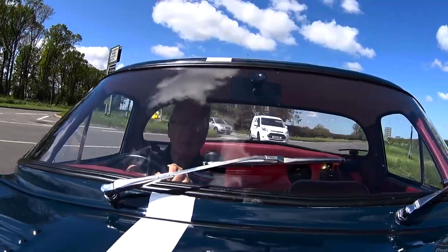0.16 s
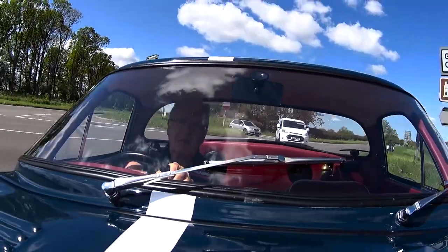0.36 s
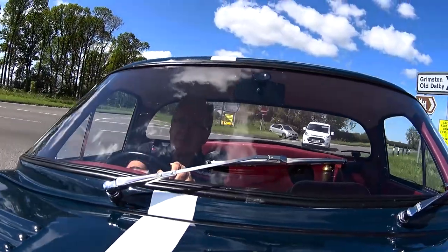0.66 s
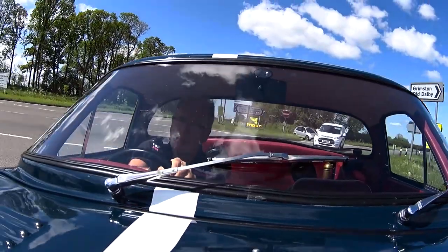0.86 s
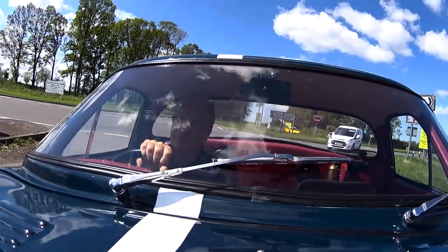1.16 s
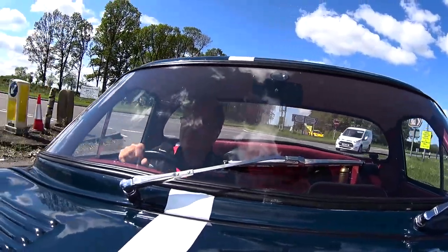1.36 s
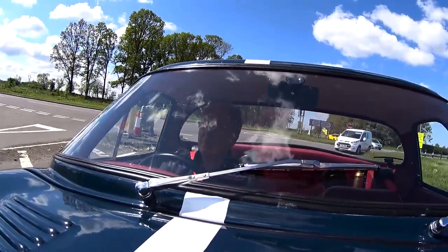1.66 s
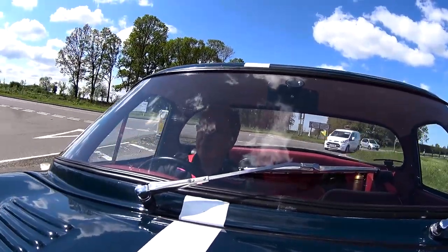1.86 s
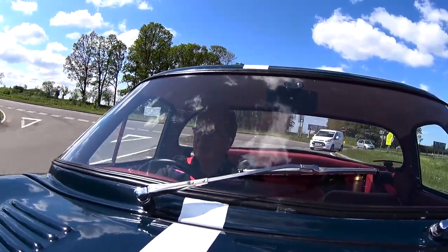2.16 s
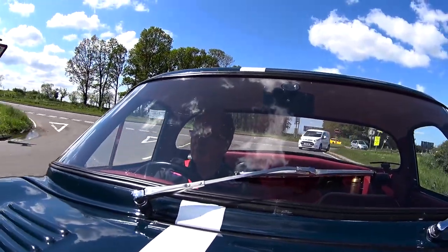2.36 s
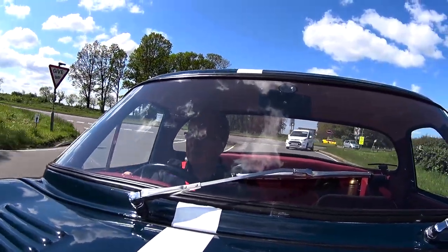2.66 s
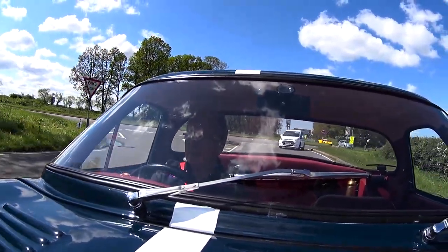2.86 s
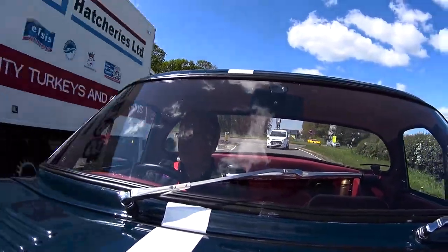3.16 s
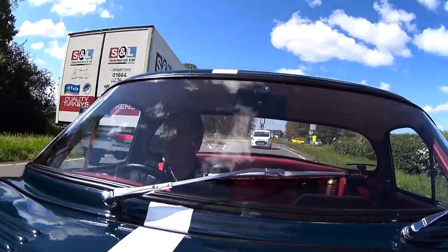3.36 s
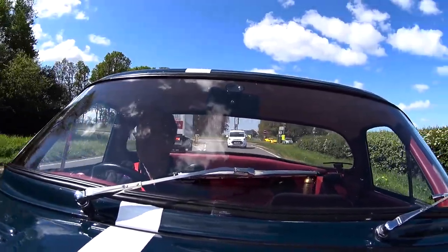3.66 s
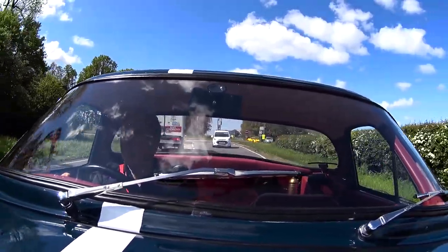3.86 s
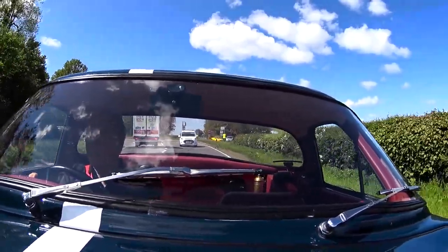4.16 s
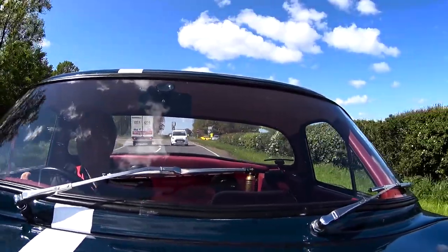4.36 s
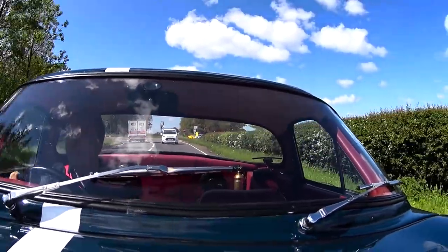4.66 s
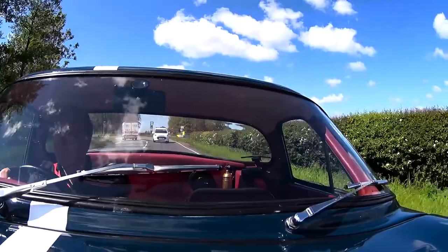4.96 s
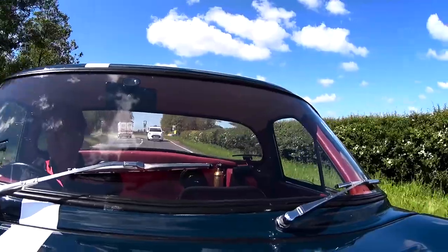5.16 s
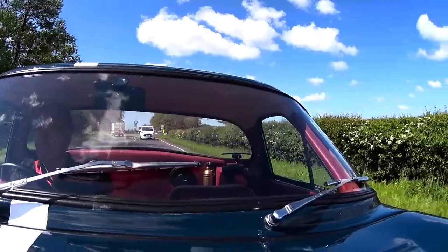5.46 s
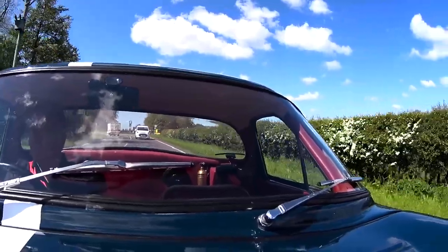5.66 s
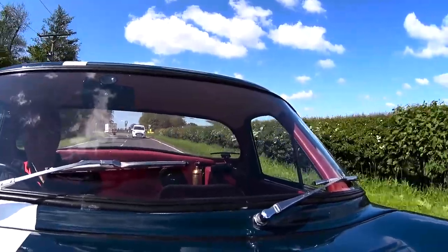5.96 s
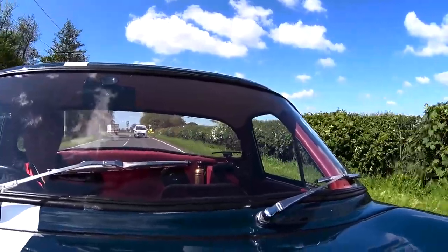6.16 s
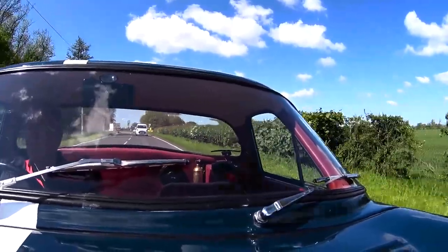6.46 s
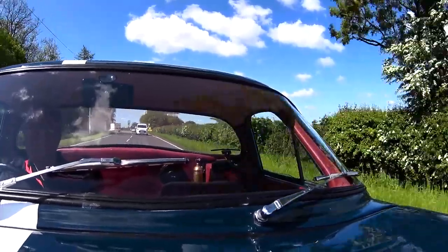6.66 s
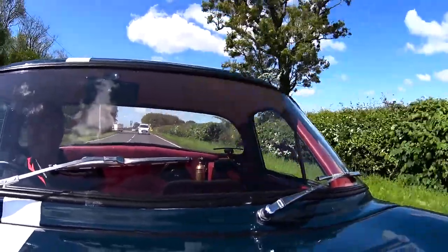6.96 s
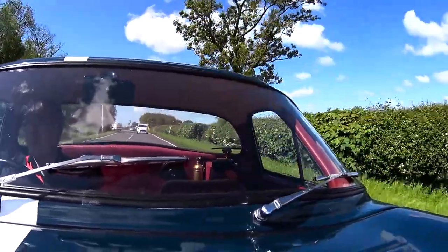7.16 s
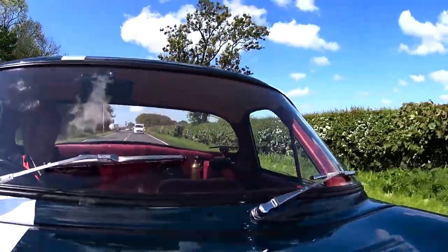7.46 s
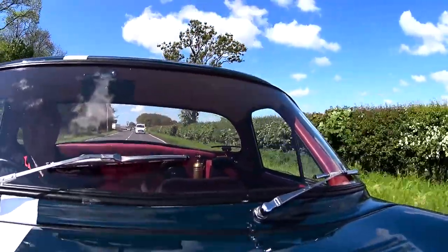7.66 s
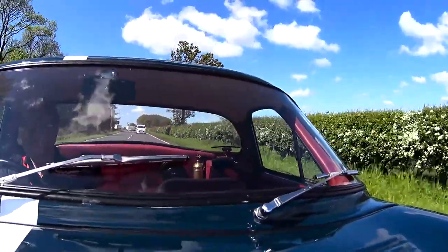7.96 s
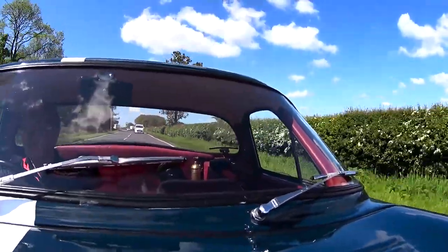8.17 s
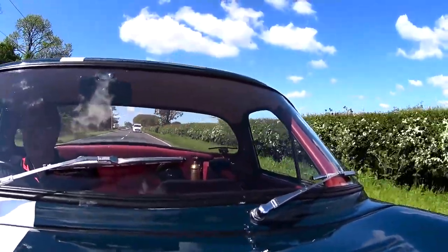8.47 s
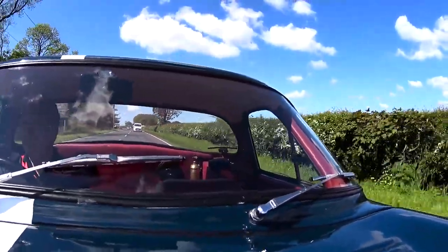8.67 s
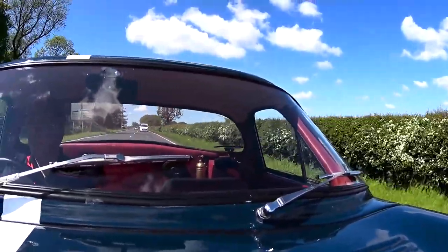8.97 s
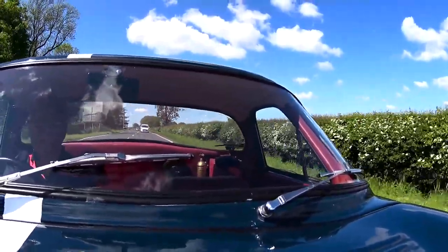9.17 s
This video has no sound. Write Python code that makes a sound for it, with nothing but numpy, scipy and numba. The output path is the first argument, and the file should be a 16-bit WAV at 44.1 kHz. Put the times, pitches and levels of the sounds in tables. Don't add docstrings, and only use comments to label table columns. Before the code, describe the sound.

A classic car's V8 on a country road, heard by a wide stereo microphone on the bonnet in the wind. First a quiet, rough coasting hum with rattling trim, then a long smooth acceleration into a hard growl, gusts thudding at the microphone and tiny metallic pings. One upshift brings a short dip, a driveline kick and a fresh burst of rattles before it pulls again.

```python
import sys
import numpy as np
from scipy import signal
from scipy.fft import rfft, irfft, next_fast_len
from scipy.io import wavfile
from scipy.ndimage import uniform_filter1d
from numba import njit

SR = 44100
rng = np.random.default_rng(int(sys.argv[2]) if len(sys.argv) > 2 else 0)


def dump_mix(stems):
    frames = np.atleast_2d(stems).T
    limited = np.clip(frames, -1, 1)
    pcm = np.round(limited * 32767).astype(np.int16)
    wavfile.write(sys.argv[1], SR, pcm)


def ratio(d):
    e = np.asarray(d, float) / 20
    return 10 ** e


N = 410571
HOP = 256
FRAMES = N // HOP + 2
T_S = np.arange(N) / SR

# t/s, load/dB, throttle shut/0-1, roughness/0-1
LOAD = [(0, -27, 0.7, 0.38), (1.1, -25.5, 0.66, 0.41), (1.18, -27, 0.27, 0.08), (2, -25.5, 0.31, 0.07),
        (3.2, -23, 0.33, 0.07), (3.8, -17, 0.2, 0), (4.4, -13.5, 0.34, 0.04), (5, -15, 0.17, 0.08),
        (5.5, -8.5, 0.28, 0.23), (6, -10.5, 0.2, 0.07), (6.5, -11.5, 0, 0), (7.03, -10.5, 0.24, 0.09),
        (7.15, -19, 0.18, 0.3), (7.7, -39, 0.5, 0.06), (8.07, -44, 1, 0), (8.12, -16, 0.12, 0.04),
        (8.6, -19, 0.13, 0.15), (9.31, -10.5, 0.42, 0.19)]
STRONG_ORDERS = [4, 8, 1, 3, 5, 17, 2, 1.5]
LOAD_MID_DB = -14
CLUTCH_OUT_S, CLUTCH_BITE_S, CLUTCH_IN_S = 7.06, 7.95, 8.3
PATCH_END_S = 1.35


def curves(table, size):
    s, *columns = np.transpose(table)
    grid_s = np.arange(N // size + 3)[:N] * size / SR
    return [np.interp(grid_s, s, c) for c in columns]


def at(table, hz):
    table_hz, db = np.array(table).T[:2]
    return np.interp(np.log(hz), np.log(np.maximum(table_hz, 1)), db)


def walk(rate_hz, count, size=FRAMES):
    k = max(int(SR / HOP / rate_hz), 1)
    w = uniform_filter1d(uniform_filter1d(rng.standard_normal((count, size)), k), k)
    return w / w.std()


def per_sample(row):
    return np.interp(np.arange(N) / HOP, np.arange(FRAMES), row)


def fade(t, start_s, end_s, edge_s):
    return np.clip(np.minimum(t - start_s, end_s - t) / edge_s, 0, 1)


def resonance(hz, f, width):
    return 1 / (1 + (2 * (hz - f) / width) ** 2)


def spread(mid, side, hz):
    # f/Hz, left minus right/dB
    lean = [(60, 1.5), (110, 4.5), (200, 1.5), (380, -1.5), (700, 0.5), (1290, -1), (2380, -0.5),
            (4400, -0.5), (8120, -0.5), (15000, 0)]
    lean_db = at(lean, hz) / 2
    return np.array([(mid + side) * ratio(lean_db), (mid - side) * ratio(-lean_db)])


def crank(size):
    # t/s, crank/Hz
    in_gear = [(0.0, 36.57), (0.28, 35.26), (1.05, 34.16), (1.3, 34.88), (1.75, 37.5), (2.2, 40.1),
               (2.8, 44.6), (3.1, 47.27), (4.0, 56.9), (4.4, 61.78), (5.1, 69.22), (5.8, 76.52),
               (6.4, 83.74), (6.8, 87.7), (8.4, 61.8), (8.8, 63.91), (9.31, 66.16)]
    # t/s, crank/Hz
    change_up = [
        (7.06, 89.2),
        (7.21, 84.2),
        (7.776, 64.8),
        (7.864, 67.1),
        (7.934, 61.45),
        (8.05, 61),
        (8.11, 64.96),
        (8.142, 65.3),
        (8.254, 61.03),
    ]
    return curves(sorted(in_gear + change_up), size)[0]


def declutched(t, rise_s):
    return np.clip(np.minimum((t - CLUTCH_OUT_S) / rise_s, (CLUTCH_BITE_S - t) / 0.027 + 1), 0, 1)


def strong_orders(hz, load_db, shut):
    strength = [(-27.5, -10.5, 0.26, 2.5), (-41.5, -2, 0.13, 8.5), (-31, 3.5, 0.037, 10),
                (-35, 1, 0.079, 3), (-48, -1, 0.12, 4), (-61, 1, 0.092, 13), (-37, -22, 0.46, 5),
                (-28, -1, 1, -24)]
    high_gear_db = [2, 2.5, -8, 4, 1, -3, 5, 4]
    # f/Hz, width/Hz, in gear/dB, change with clutch out/dB
    exhaust_modes = [(158, 35, 6, .1), (204, 31, 10.5, -2), (254.6, 30.7, 12.5, 0), (289.7, 45, 9, -10.5),
                     (322.4, 38.6, -15.5, 9), (341, 36, 7, 9), (474.5, 38, 12.5, 3), (520, 4.8, 0, -7),
                     (566, 27, 6.5, 0), (639, 74, -11, 14), (697.6, 52, 6.5, 9)]
    # f/Hz, width/Hz, in gear/dB, change with clutch out/dB
    mount_modes = [(40.1, 1.5, 4.5, .1), (51.7, 8.5, 3.5, 3), (58.8, 6.8, 11.5, -9), (97.7, 3.7, 9.5, -1),
                   (120, 32, -13, -1), (166.7, 18, 8, -8), (205, 27, 3, 14), (228, 12, -2.5, 3.5),
                   (255.3, 67, 14.5, -5), (341, 35, 10, 7), (399, 73, 6.5, 18.5), (733, 58.2, 5, 3),
                   (834, 56, 12.5, .1), (932, 86, 10.5, 2), (1020, 60, -10, .1), (784, 39, -8, .1)]
    t = np.arange(len(shut)) * HOP / SR
    db, shut_db, share, pull_db = np.transpose(strength)[:, :, None]
    free = declutched(t, 0.24)
    exhaust, mounts = (sum((g + change * free) * resonance(hz, f, w) for f, w, g, change in modes)
                       for modes in (exhaust_modes, mount_modes))
    firing = np.array(STRONG_ORDERS)[:, None] % 4 == 0
    db = db + shut_db * shut + share * (load_db - LOAD_MID_DB)
    db = db + pull_db * fade(t, 1.85, CLUTCH_OUT_S, 0.1)
    db = db + np.c_[high_gear_db] * (t > CLUTCH_BITE_S)
    return db + np.where(firing, exhaust, mounts)


def order_levels(order, crank_hz, load_db, shut):
    # order, under load/dB, change with throttle shut/dB
    source = [(.5, -47, -13), (2.5, -33.5, -1.5), (3.5, -38, -21), (4.5, -44, 9), (5.5, -31.5, 3.5),
              (6, -24.5, -39), (6.5, -28, 8), (7.0, -25.5, -2), (7.5, -30.5, -6), (8.5, -30.5, -19),
              (9, -24.5, -14.5), (9.5, -24, -24), (10, -27.5, -4.5), (11.5, -35.5, -3), (12.0, -28, -22),
              (13.0, -34.5, -13), (13.5, -27, -16), (14, -21.5, -30), (15.0, -30.5, -7.5),
              (16.0, -25.5, -16), (16.5, -21.5, -26), (17.5, -28, -7), (18.0, -28.5, -15), (19.0, -30, -17),
              (19.5, -26, -19), (20, -26.5, -19), (20.5, -30.5, -18), (21.0, -40, -5), (22.0, -33.5, -16)]
    # order, slope/dB per octave of crank speed, change in high gear/dB, trim/dB
    drift = [(.5, 2, -9, 0.5), (3.5, -3, -8, 2), (4.5, 0, 0, 4), (5.5, 3, -2.5, -1), (6, 1.5, -4.5, 3),
             (6.5, 3.5, -9, -2.5), (7, 7, -2, -2), (7.5, 4.5, -3, 0.5), (8.5, -5, 7.5, 2), (9, -8, -4, -3),
             (9.5, -7.5, 4, -0.5), (10, 1, 7, -3), (10.5, -0.5, -5, -0.5), (11, -4.5, 7, 4),
             (11.5, 11, 8, -1), (12, 3, 6, 1), (12.5, 2.5, 4, 2), (13, 2.5, -11, 2), (13.5, 7, 3.5, 0),
             (14, 5.5, -3, -1.5), (14.5, 11.5, -1, -1), (15, 9, -11, -1), (15.5, 5, 0, -0.5),
             (16, 8, 3, -0.5), (16.5, 4, 8, 0.5), (17.5, -0.8, -0.5, 1.2)]
    # f/Hz, width/Hz, level/dB
    body = [(83.2, 26, 17), (134, 59, 18), (181, 22, 9.5), (259, 56, 24), (347.4, 47, 13.5), (403, 65, 8.5),
            (475, 45.3, 21), (517, 10.5, 7), (556.8, 33.6, 12), (605, 30, 2.5), (691, 52, 11.5),
            (854, 20, 13), (929, 63, 15), (1039.4, 45, 1.5), (1145, 75, 13), (1235, 23, 13), (1591, 67, 12),
            (1737, 50, 10)]
    # order, t/s, length/s, level/dB
    surges = [(8, 2.24, 0.19, 8.5), (8, 8.16, 0.22, 2), (6, .2, .25, -6), (6, 1.1, .25, 4),
              (6, 3.12, 0.21, 12.5), (6, 5.24, 0.17, 1), (6.5, 3.96, 0.97, -6), (8.5, 9, .4, -6),
              (7, 6.1, .4, -8), (7, 9.9, .25, 2), (7, 7.8, .25, -6), (7.5, 5.4, .35, -13),
              (7.5, 5.9, .25, 13), (5.5, 4.23, 0.27, 7.5), (5.5, 6.52, 0.2, -8), (5.5, 7.66, .35, 8),
              (5, 7, .2, 12), (5, 9.8, .25, 14), (3, 7.35, 0.14, -11), (3, 8.5, 0.28, -7),
              (4, 6.62, .25, -6.5), (4, 8.5, 0.29, -7), (2, 2.6, .7, 6), (4.5, 3.2, 0.38, 10),
              (4.5, 8.6, .25, 8), (10, 4.33, 0.22, 14), (10, 1.9, 0.46, 3), (10, 7.1, .6, -5),
              (10, 5.9, .25, 3), (12, 2.97, 0.36, 13), (12, 3.86, .25, 7), (13, 2.4, .4, 8),
              (13, 3.8, .3, 4), (13, 4.84, 0.21, 5), (13, 6.8, 0.45, 4), (9.5, 2.704, 0.23, -14),
              (11, 1.4, 0.27, -5), (17.5, 3.3, 0.63, -10), (16.5, 6.5, .4, -5), (16.5, 8.6, .7, -8),
              (15.5, 2.67, 0.3, 11), (14, 6.7, .35, -2), (8.5, 7.1, 0.31, 6), (7, 9.1, 0.17, -4.5),
              (4, 8.54, 0.27, 3.5), (8, 5.7, 0.16, 5.5), (17, 2.64, .3, 2.5), (7.5, 8.3, 0.18, 4),
              (5.5, .15, .15, -5), (4, 1.24, 0.13, 4)]
    hz, t = order * crank_hz, np.arange(len(shut)) * HOP / SR
    source_order, load_level, shut_change = np.transpose(source)
    db = np.interp(order, source_order, load_level) + shut * np.interp(order, source_order, shut_change)
    drift_order, *columns = np.transpose(drift)
    slope_db, gear_db, trim_db = (np.interp(order, drift_order, c) for c in columns)
    db = db + trim_db + slope_db * np.log2(crank_hz / 60) + gear_db * (t > CLUTCH_BITE_S)
    db = db + load_db - 6.5 * np.log2(1 + hz / 517)
    db = db + sum(g * resonance(hz, f, w) for f, w, g in body)
    rows = (2 * np.array(STRONG_ORDERS)).astype(int) - 1
    db[rows] = strong_orders(hz[rows], load_db, shut)
    return db + sum(g * np.exp(-((order - k) / .3) ** 2 - ((t - s) / d) ** 2) for k, s, d, g in surges)


@njit
def harmonics(cycle_hz, size, hop):
    out, p = np.zeros((2, len(cycle_hz))), 0.
    for i in range(len(cycle_hz)):
        p += 2 * np.pi * cycle_hz[i] / SR
        turn, z, j, u = np.exp(1j * p), 1 + 0j, i // hop, (i % hop) / hop
        for k in range(size.shape[2]):
            z *= turn
            for c in range(2):
                out[c, i] += (z * (size[c, j, k] * (1 - u) + size[c, j + 1, k] * u)).imag
    return out


def engine():
    # f/Hz, side minus mid/dB
    line_width = [(50, -36), (90, -7.5), (150, -16), (225, -4), (262, -21), (350, -14), (420, -14),
                  (475, -9.5), (520, 5.5), (640, -31), (800, -14), (1200, -7), (1800, -6.5)]
    burble_hz = 300
    crank_hz = crank(HOP)
    load_db, shut, rough = curves(LOAD, HOP)
    count = len(rough)
    order = np.arange(1, 61)[:, None] / 2
    hz = order * crank_hz
    db = order_levels(order, crank_hz, load_db, shut)
    db = db + 2.2 * np.clip(hz / burble_hz - .5, .3, 1) * walk(3, 60, count)
    shake = walk(16, 120, count).reshape(2, 60, -1)
    smear = np.clip(rough + .3 * np.clip(2 * (hz / burble_hz - 1), 0, 1), 0, 1)
    mid = np.sqrt(2) * ratio(db) * np.exp(2j * np.pi * rng.random((60, 1)))
    mid = mid * (1 + smear * (shake[0] + 1j * shake[1]))
    path_rad = np.pi / 2 + 0.75 * walk(2.2, 60, count)
    side = mid * ratio(at(line_width, hz)) * np.exp(1j * path_rad)
    size = np.ascontiguousarray(spread(mid, side, hz).transpose(0, 2, 1))
    return harmonics(crank(1) / 2, size, HOP)


def rush(colour, swell_db, flicker_db, flicker_hz):
    # f/Hz, side minus mid/dB
    width = [(25, -8), (60, -3.5), (110, -5.5), (200, -3.5), (380, -7.5), (700, 0), (1290, -7),
             (2380, -2.5), (4400, -3.5), (8120, -2.5), (15000, -2.5)]
    band_oct = .6
    low_hz, high_hz = colour[0][0], colour[-1][0]
    n = next_fast_len(N)
    hz = np.arange(n // 2 + 1) * SR / n + 1e-3
    noise = rfft(rng.standard_normal((2, n))) * ratio(at(colour, hz)) * (hz > low_hz) * (hz < high_hz)
    noise = spread(noise[0], noise[1] * ratio(at(width, hz)), hz)
    centres = np.arange(np.log2(low_hz), np.log2(high_hz) + band_oct, band_oct)
    db = swell_db * walk(flicker_hz, 1) + flicker_db * walk(flicker_hz, len(centres))
    out = 0
    for centre, row in zip(centres, db):
        weight = np.clip(1 - abs(np.log2(hz) - centre) / band_oct, 0, 1)
        out = out + irfft(noise * weight, n)[:, :N] * per_sample(ratio(row))
    return out / out.mean(0).std()


def rush_levels():
    # idle/dB, per octave road/dB, per octave crank/dB, share of load change, clutch out/dB, lorry/dB
    law = [
        (-34.5, 16, 0.11, 0.013, -1.3, 4),
        (-44.5, 11, 3.17, 0.0083, -1, 2.5),
        (-62.5, 8.5, 9.35, 0.036, -2, 2),
    ]
    idle_hz, gear_step = 36, 1.298
    crank_hz, load_db = crank(1), curves(LOAD, 1)[0]
    in_gear = (T_S < CLUTCH_OUT_S) | (T_S > CLUTCH_IN_S)
    geared_hz = crank_hz * np.where(T_S > CLUTCH_IN_S, gear_step, 1)
    road_hz = np.interp(T_S, T_S[in_gear], geared_hz[in_gear])
    lorry = np.exp(-((T_S - 3.22) / 0.19) ** 2)
    free = declutched(T_S - .12, 0.3)
    road_oct, crank_oct = np.log2(road_hz / idle_hz), np.log2(crank_hz / idle_hz)
    return [db + a * road_oct + b * crank_oct + c * (load_db - LOAD_MID_DB) + d * free + e * lorry
            for db, a, b, c, d, e in law]


def airflow():
    # t/s, level/dB
    gusts = [(0.0, -31), (1.19, -27.5), (1.27, -27.5), (1.74, -47), (1.94, -33), (3.11, -32.5),
             (3.19, -23.5), (3.86, -29), (3.94, -22.5), (4.43, -19.5), (4.69, -29), (4.77, -19),
             (5.63, -14.5), (5.73, -18.5), (6.92, -15.5), (7.03, -17.5), (7.08, -14.5), (9.31, -18.5)]
    # f/Hz, density/dB per Hz
    wind_colour = [(12, -12.5), (20, 1.5), (26, -1.5), (34, 0), (42, 0), (55, -9.5), (80, -9.5),
                   (120, -20.5), (200, -37)]
    # f/Hz, density/dB per Hz
    tyre_colour = [(50, 4.5), (85, 0.5), (130, -2), (200, -14), (270, -6), (380, -13.5), (480, -11),
                   (650, -43)]
    # f/Hz, density/dB per Hz
    roar_colour = [(420, -21), (500, -22), (620, -9), (800, -11), (1000, -13.5), (1220, -14), (1420, -20),
                   (1700, -20.5), (2100, -28.5), (2600, -33), (3500, -41), (4500, -53)]
    # f/Hz, density/dB per Hz
    hiss_colour = [(1470, -27), (2500, -6), (3750, -7), (5900, -9), (7480, -12), (10900, -13.5),
                   (14800, -21.5), (15600, -19)]
    tyre_db, roar_db, hiss_db = rush_levels()
    firing = np.cos(2 * np.pi * np.cumsum(4 * crank(1)) / SR)
    wind = ratio(curves(gusts, 1)[0] + 9.5) * np.tanh(1.31 * rush(wind_colour, 0.39, 0.42, 12))
    tyres = ratio(tyre_db) * rush(tyre_colour, 0.58, 0.83, 14)
    roar = ratio(roar_db + 0.84) * rush(roar_colour, 0.39, 0.44, 18) * (1 + 0.16 * firing)
    lull_db = -6 * np.exp(-((T_S - 4.892) / .014) ** 2)
    hiss = ratio(hiss_db + lull_db) * rush(hiss_colour, 0.26, 0.24, 18) * (1 + 0.03 * firing)
    return wind + tyres + roar + hiss


def eddies():
    # f/Hz, density/dB per Hz
    eddy_colour = [(15, 11), (30, -11.5), (60, -1.5), (100, -17), (160, -12.5), (250, -13.5)]
    return ratio(rush_levels()[2] + 25.5) * rush(eddy_colour, 2.5, 0.89, 30)[0] * np.array([[1], [-1]])


def patched_tarmac():
    # f/Hz, density/dB per Hz
    patch_colour = [(60, -9), (90, 5), (150, -21), (215, 7), (280, -12.5), (360, -5), (430, -8), (520, -35)]
    return ratio(-30) * rush(patch_colour, 0.7, 1.3, 15) * np.clip((PATCH_END_S - T_S) / 0.044, 0, 1)


def self_noise():
    # f/Hz, density/dB per Hz
    noise_colour = [(2500, 18), (6000, -3), (11000, 7.5), (15700, 0)]
    return ratio(-67.5) * rush(noise_colour, 0.11, .1, 9)


def knocks(events, modes, db, pan_db, chatter):
    out, t = np.zeros((2, N + SR)), np.arange(SR // 3) / SR
    hz, mode_db, t60_s = np.array(modes).T[:, :, None]
    place = np.linspace(-.5, .5, len(modes))[:, None]
    pan = np.array([[pan_db], [-pan_db]]) / 2
    chances = rng.standard_normal((len(events), len(modes), len(t)))
    for (s, peak_db, tilt_db), chance in zip(events, chances):
        size = ratio(mode_db + tilt_db * place + 1.5 * chance[:, :1])
        ring = size * np.sin(2 * np.pi * hz * t) * np.exp(-np.log(1000) * t / t60_s)
        ring = ring * (1 + chatter * uniform_filter1d(uniform_filter1d(chance, size=40), size=40))
        ring = ring.sum(0) * np.minimum(t / 0.001, 1)
        start = int(s * SR)
        out[:, start:start + len(t)] += ring * ratio(peak_db + db + pan)
    return out[:, :N]


def clip_ticks():
    # t/s, peak/dB, tilt lowest to highest mode/dB
    ticks = [(.008, -58, -1), (.6549, -59, -2), (1.3214, -58, -2), (1.8327, -61, -5), (1.9574, -58, -2),
             (2.4184, -50, 10), (2.595, -62, -2), (2.7701, -60, -4), (3.04, -61, 1), (3.4511, -57, 3),
             (7.9992, -48, -2), (8.756, -47, 6), (8.8134, -45, 4)]
    # f/Hz, level/dB, t60/s
    clip_modes = [(7800, 2, .02), (9600, 0, .03), (11900, -1.5, .05), (12900, -3, .05), (14300, -4, .04),
                  (15300, -7, .03)]
    return knocks(ticks, clip_modes, db=0.5, pan_db=2.0, chatter=6)


def trim_rattles():
    # t/s, peak/dB, tilt lowest to highest mode/dB
    rattles = [(.024, -60, 6), (.0942, -53, 1), (.1531, -58, -2), (.2114, -52, -3), (.2783, -53, -5),
               (.3481, -51, -2), (.4125, -52, 2), (.4813, -53, 2), (.5447, -47, -1), (.6075, -53, 2),
               (1.03, -58, -8), (1.1258, -63, -8), (1.275, -59, 6), (2.4423, -52, -10), (2.4957, -54, 10),
               (2.5576, -45, 6), (2.6189, -45, 8), (2.6883, -48, 2), (3.317, -50, 8), (3.39, -48, 10),
               (3.5049, -42, 6), (4.047, -45, 6), (4.115, -46, 10), (5.125, -44, 8), (7.6081, -38, -2),
               (8.1249, -47, 8), (8.186, -44, 8), (8.2482, -45, 8), (8.315, -45, 10), (8.3764, -42, 10),
               (8.4377, -50, 8), (8.89, -42, 7), (8.9514, -40, 6)]
    # f/Hz, level/dB, t60/s
    trim_modes = [(2670, -8, .045), (3030, -5, .055), (3480, -3.5, .07), (3770, -3, 0.085), (4170, -6, .06),
                  (4430, -3, .065), (4720, 0, 0.085), (4930, -1, .08)]
    return knocks(rattles, trim_modes, db=-6.5, pan_db=-4.0, chatter=3.2)


def drone():
    wobble, throb = (per_sample(w) for w in walk(9.1, 2))
    hum = np.sin(2 * np.pi * np.cumsum(87.9 * (1 + 0.01 * wobble)) / SR) * ratio(-22 + 1.9 * throb)
    return hum * fade(T_S, 0.19, PATCH_END_S, .06) * ratio(np.array([[1.5], [-1.5]]))


def squeaks():
    # t/s, length/s, f/Hz, level/dB
    squeak_events = [
        (.268, .15, 1674, -50),
        (.6, .08, 1660, -62),
        (.6, .3, 5750, -78),
        (.68, .1, 3040, -67),
        (1.15, .1, 1670, -62),
        (1.2, 1.3, 3450, -74),
        (6.82, .2, 1775, -44),
        (8.76, .3, 516, -26),
    ]
    wobble, flutter = (per_sample(w) for w in walk(25, 2))
    clock_s = T_S + .004 * np.cumsum(wobble) / SR
    tones = sum(ratio(db) * np.sin(2 * np.pi * hz * clock_s) * fade(T_S, s, s + d, .012)
                for s, d, hz, db in squeak_events)
    return ratio(2.2 * flutter) * tones


def whines():
    # t/s, length/s, order, level/dB
    mesh_tones = [
        (2.0, 4.3, 39, -65),
        (6.0, .3, 39, -57),
        (6.3, .28, 39, -49),
        (6.92, .07, 39, -48),
        (6.94, .1, 40, -47),
        (7.3, .13, 38.7, -47),
    ]
    turns = np.cumsum(crank(1)) / SR
    flutter = per_sample(walk(20, 1)[0])
    tones = sum(ratio(db) * np.sin(2 * np.pi * k * turns) * fade(T_S, s, s + d, .02)
                for s, d, k, db in mesh_tones)
    return ratio(2.5 * flutter) * tones


def spring_pings():
    # t/s, peak/dB, tilt lowest to highest mode/dB
    pings = [(2.4753, -46, 4), (2.6509, -55, -3), (2.6763, -54, -8), (2.7387, -58, -3), (2.7861, -50, 3),
             (3.04, -55, 9), (3.0814, -53, 8), (3.735, -52, 8), (4.0103, -52, -6), (4.0831, -52, -2),
             (4.14, -53, 8), (4.2413, -48, .1), (4.32, -52, 8), (4.4797, -49, 8), (4.6059, -53, 6),
             (5.1093, -44, 5), (5.7843, -51, -1), (6.0202, -49, 4), (6.3425, -46, .1), (6.4248, -49, -5),
             (6.6333, -47, 3), (6.7895, -47, 3), (8.0964, -46, 6), (8.13, -46, 8), (8.1698, -42, 8),
             (8.4163, -42, 10), (8.7554, -47, 6), (9.2125, -47, 10)]
    # f/Hz, level/dB, t60/s
    spring_modes = [(10050, -2, .13), (10780, -1.5, 0.22)]
    return knocks(pings, spring_modes, db=-5.5, pan_db=8, chatter=2.3)


def scene():
    steady = engine() + airflow() + eddies() + patched_tarmac() + self_noise()
    loose_parts = clip_ticks() + trim_rattles() + spring_pings()
    return steady + loose_parts + drone() + squeaks() + whines()


@njit
def limiter(x, top, attack, release):
    gain, e = np.ones(x.shape[1]), 0.
    for i in range(x.shape[1]):
        a = max(abs(x[0, i]), abs(x[1, i]))
        e += (a - e) * (attack if a > e else release)
        gain[i] = min(1., top / (e + 1e-9))
    return gain


def top_cut(x):
    return signal.sosfilt(signal.butter(12, 15770, fs=SR, output="sos"), x)


def record(dry):
    x = dry * limiter(dry, .8, 1 / (.002 * SR), 1 / (.02 * SR))
    x = x * np.minimum(.4 + T_S / .02, 1)
    x = .79 * np.tanh(x / .79)
    return top_cut(x)


dry = scene()
out = record(dry)
dump_mix(out)
```